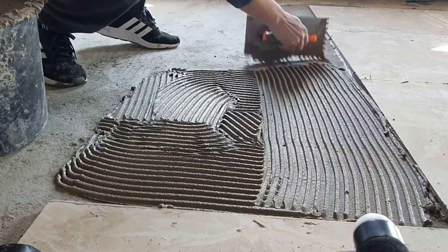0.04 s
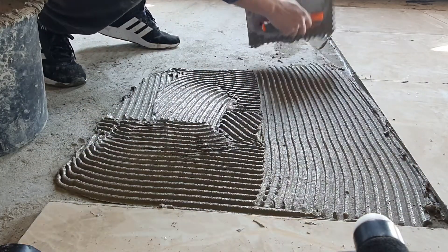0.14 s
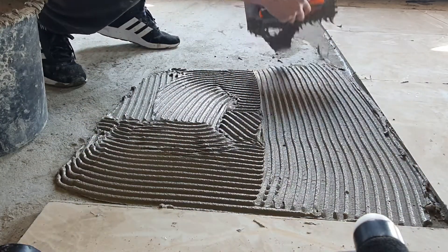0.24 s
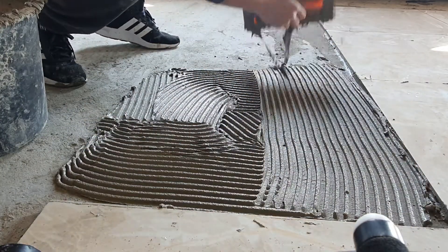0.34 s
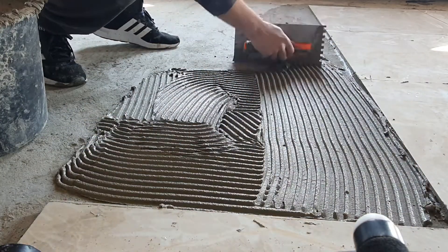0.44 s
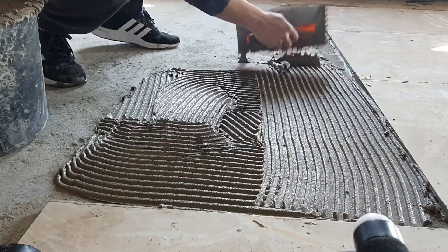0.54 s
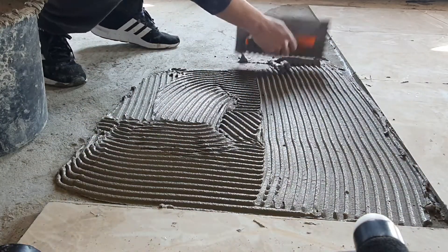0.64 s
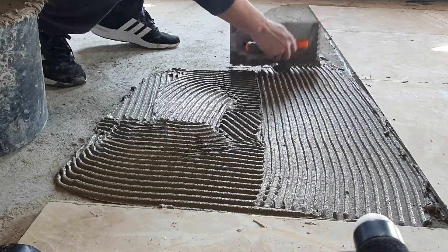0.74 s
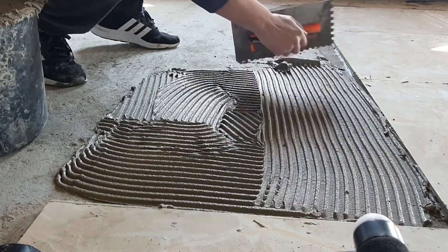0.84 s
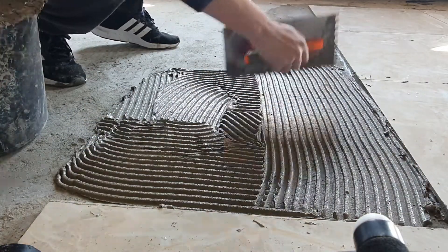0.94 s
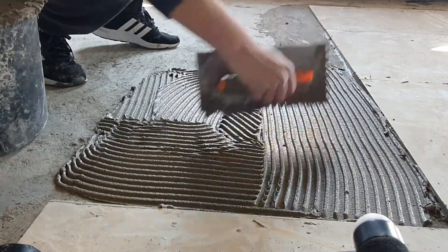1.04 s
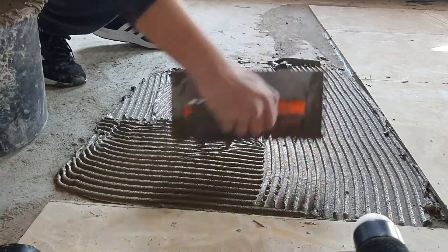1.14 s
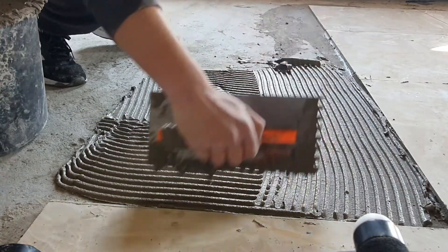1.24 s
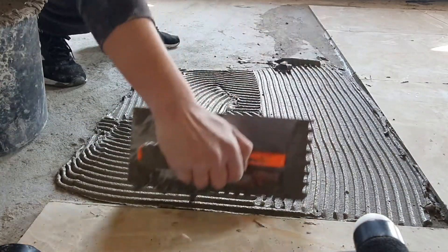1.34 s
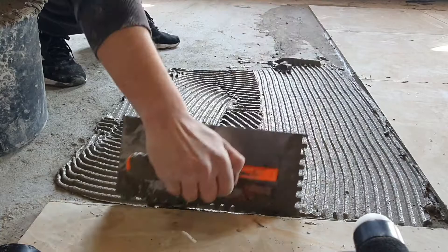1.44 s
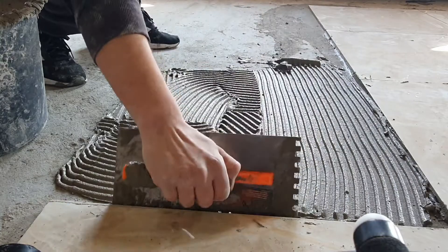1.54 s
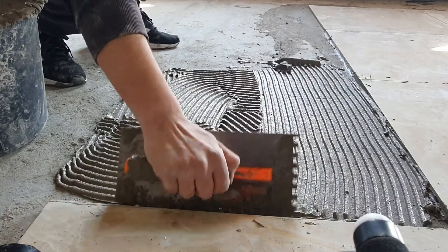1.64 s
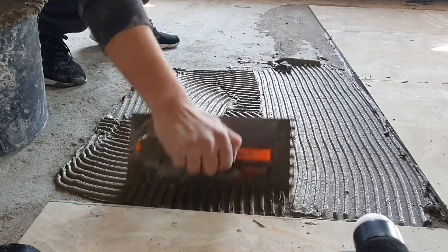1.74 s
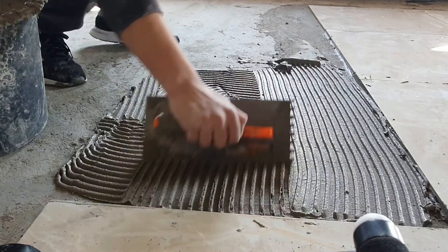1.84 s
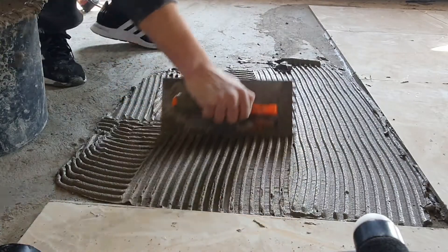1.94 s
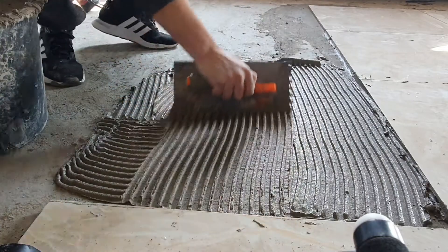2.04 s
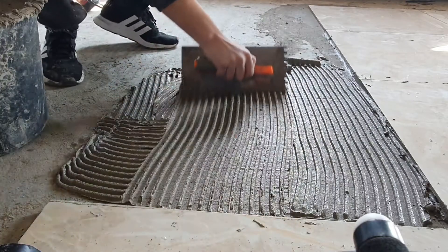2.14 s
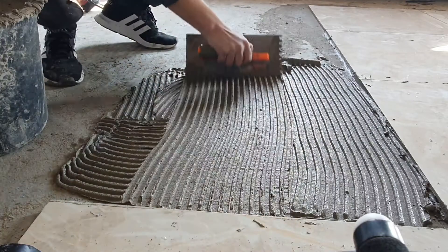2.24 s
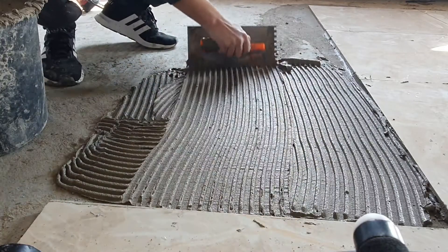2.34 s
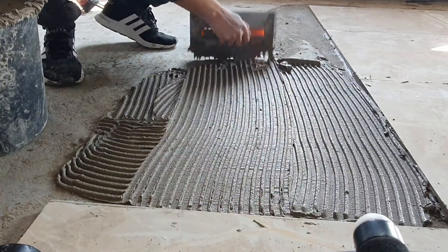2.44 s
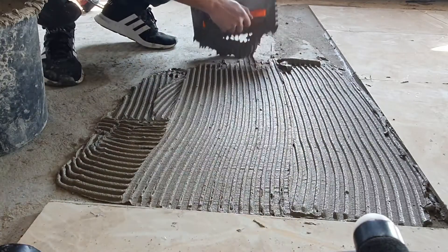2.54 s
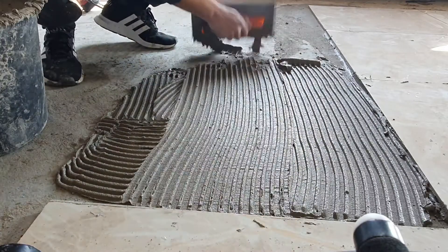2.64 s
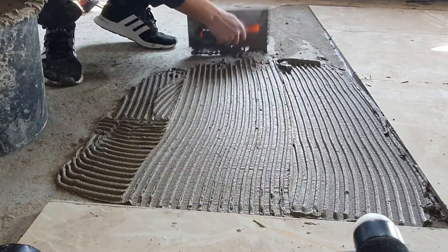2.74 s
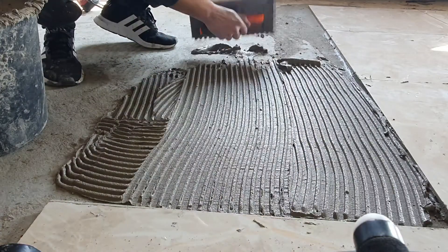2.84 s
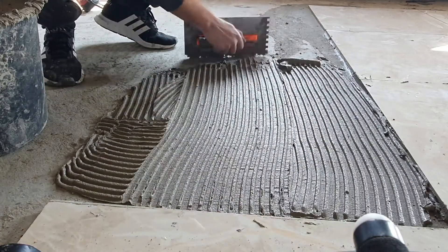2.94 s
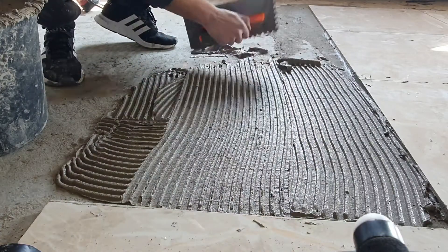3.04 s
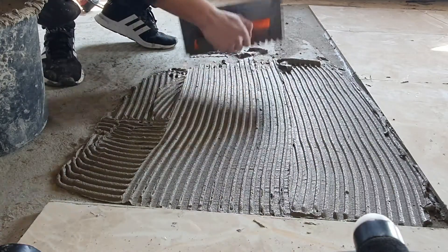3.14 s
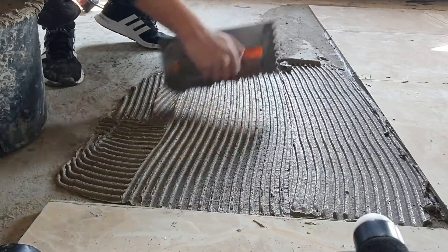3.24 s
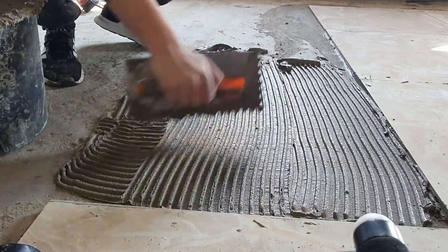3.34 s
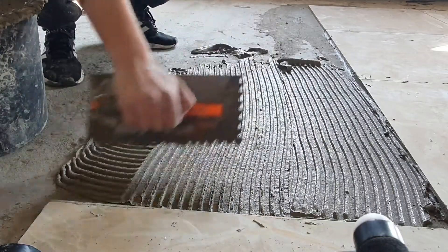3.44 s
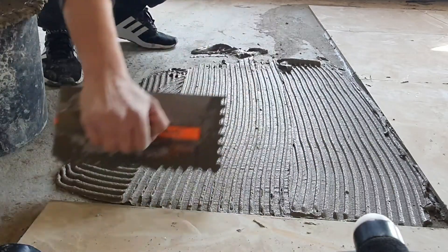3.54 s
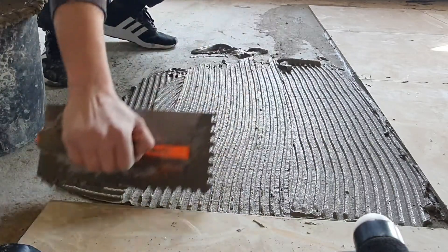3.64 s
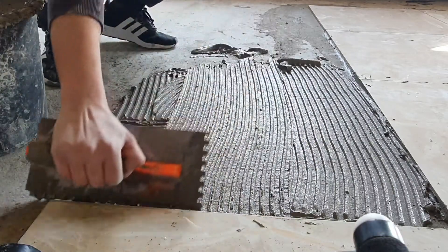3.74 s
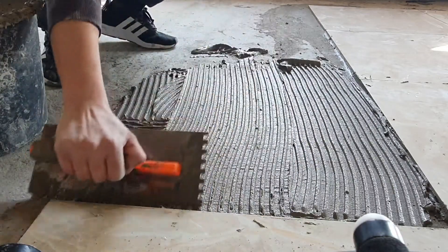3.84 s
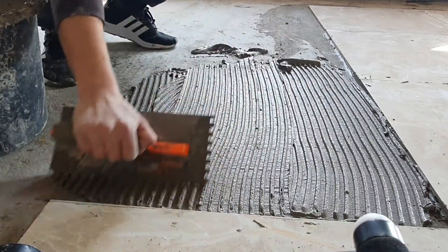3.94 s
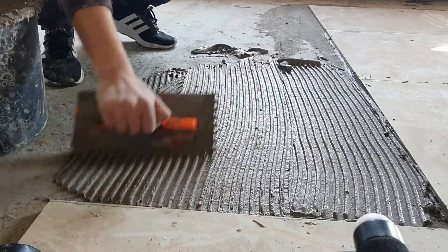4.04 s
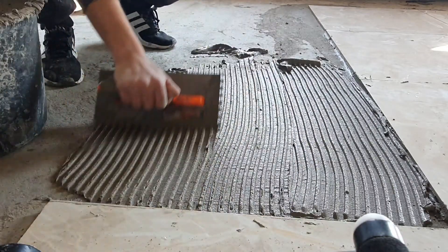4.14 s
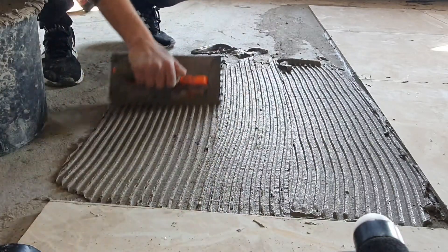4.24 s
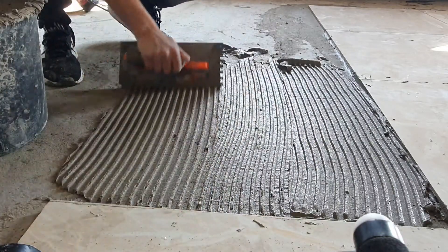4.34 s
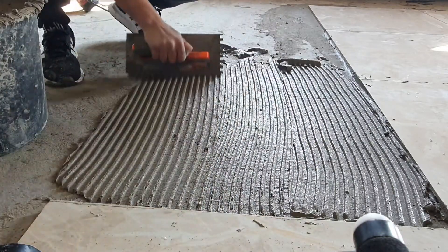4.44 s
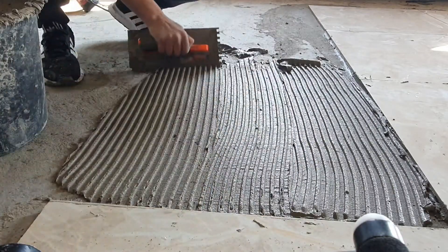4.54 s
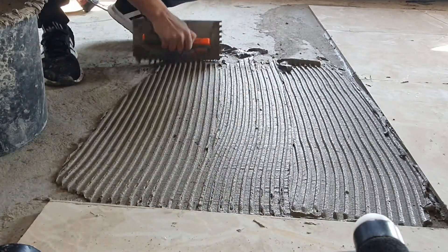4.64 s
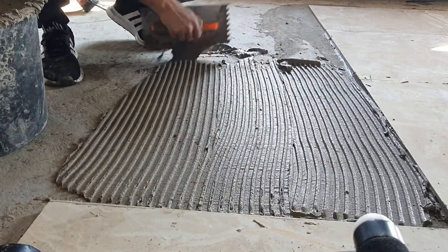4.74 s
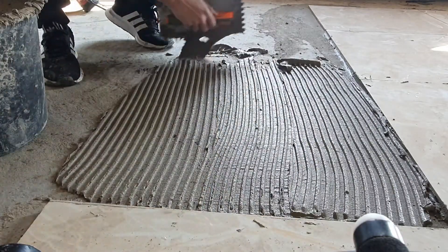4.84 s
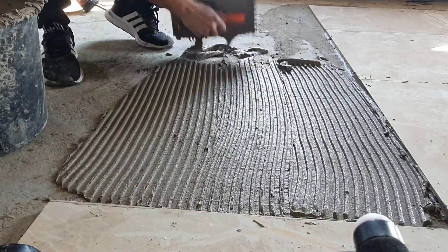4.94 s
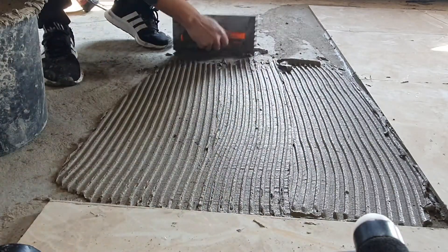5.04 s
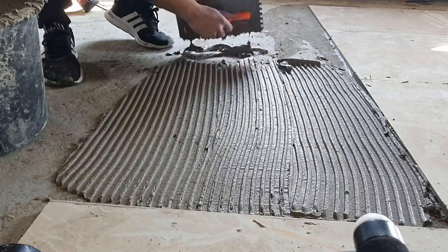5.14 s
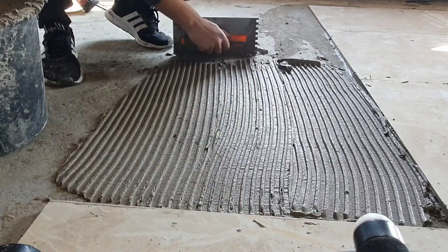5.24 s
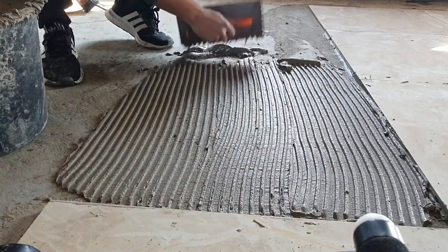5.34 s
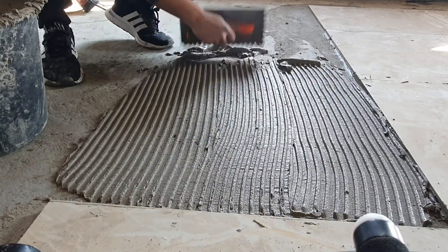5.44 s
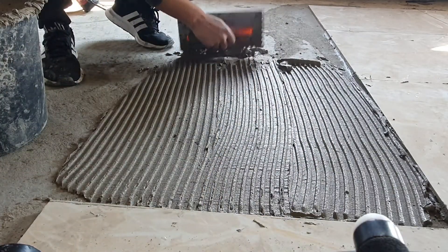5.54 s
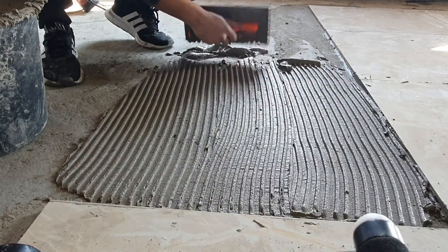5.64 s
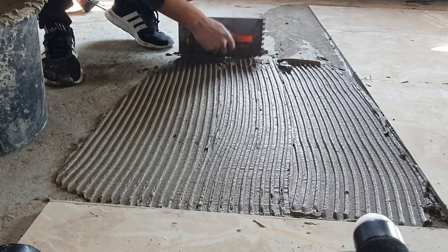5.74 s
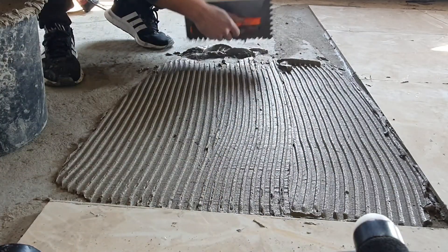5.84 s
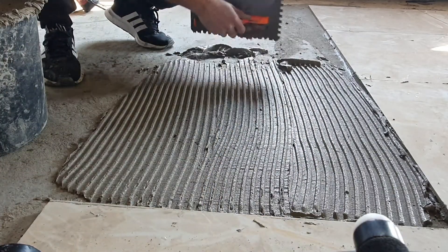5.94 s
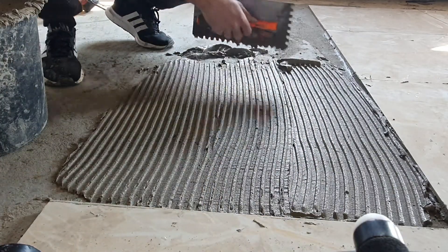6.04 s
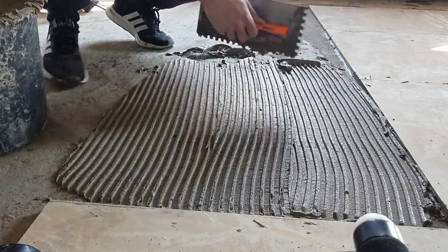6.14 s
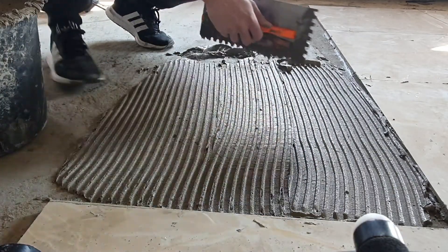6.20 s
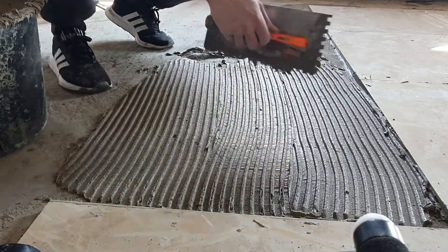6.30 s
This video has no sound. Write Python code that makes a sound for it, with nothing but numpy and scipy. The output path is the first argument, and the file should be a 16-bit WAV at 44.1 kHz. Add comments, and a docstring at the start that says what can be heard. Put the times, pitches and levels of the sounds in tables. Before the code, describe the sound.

In a bare, echoing garage, the tail of a trowel stroke is followed by two sharp knocks of steel on concrete. A long gritty scrape follows, juddering and fading as it moves away, then two more knocks, a second long scrape and four spaced clacks. Fine sand hisses under the teeth. Finally a soft shoe shifts on the floor. Close stereo pickup with lively room reflections.

```python
"""In a bare, echoing garage a notched steel trowel combs wet tile adhesive over a concrete floor.
One stroke is just ending, two full ones follow: stick-slip judders the teeth, the blade rings, sand hisses.
Each stroke fades as it is drawn away; where the hand bears down it swells, brightens and judders lower.
After each stroke the trowel is knocked on the floor to shed adhesive: a clack, a boom and a brief free ring.
Single teeth tick now and then; at the end a soft shoe is set down."""
import sys
import numpy as np
from scipy import signal
from scipy.fft import rfft, irfft
from scipy.io import wavfile
from scipy.ndimage import uniform_filter1d

SR = 44100
rng = np.random.default_rng(int(sys.argv[2]) if len(sys.argv) > 2 else 0)


def inscribe(sig):
    """Save sig as 16-bit PCM at rate SR to the path in sys.argv[1].

    A 1-D sig is mono; a 2-D sig holds one channel per row.
    Samples are clipped to [-1, 1] before scaling.
    """
    pcm = np.round(np.clip(np.atleast_2d(sig).T, -1, 1) * 32767)
    wavfile.write(sys.argv[1], SR, pcm.astype(np.int16))


N = 280917

LEAD = SR // 2   # samples: the work is under way half a second early, so the room already rings
TIME = np.arange(-LEAD, N) / SR
M = len(TIME)

# Strokes drawn away from the microphones. Each row: start in seconds, end in seconds, relative level in dB,
# fade in dB per second, stickiness of the paste in dB, which lifts judder and drag.
STROKES = [(-0.2, -0.01, 0.31, 4.8, -0.5), (1.637, 2.358, -0.47, 6.3, 1.5), (3.838, 4.602, -0.8, 16.2, 0)]
# The hand bears down and the teeth bite through to the concrete. Each row: start in seconds,
# length in seconds, extra pressure in dB, extra rasp in dB.
BITES = [(-0.04, 0.061, 8.5, -11.5), (1.643, 0.092, 1.5, 2.5), (1.745, 0.067, 5.5, 2), (1.94, 0.085, 6, -2),
         (2.264, 0.108, 9.5, 0), (2.322, 0.037, 1, 5), (3.868, 0.19, 6, 2), (4.322, 0.038, 11, -4.5),
         (4.478, 0.14, 12, 0)]
# The teeth catch and the blade shudders for a moment. Each row: time in seconds, relative judder level in dB.
SHUDDERS = [(0.041, -23.5), (1.855, -26.5), (1.955, -22), (2.11, -26), (2.161, -23.5), (2.205, -21.5),
            (2.41, -21.5), (2.565, -33.5), (3.901, -17.5), (4.211, -32), (4.366, -27)]
# The edge brushes the floor as it is set down. Each row: time in seconds, level in dB against a full stroke.
GRAZES = [(1.502, -34), (1.548, -26), (1.573, -30), (3.775, -17.5), (3.795, -10.5), (3.811, -11.5),
          (3.839, -18), (5.012, -10), (5.245, -9.5)]
# Friction laws of the layers. Columns: relative level at the start of a stroke in dB,
# extra fade in dB per second, share of a bite's dB, release in dB per second.
JUDDER_LAW = (-28, -2, 0.67, 68.5)
DRAG_LAW = (-28.5, -1, 0.7, 99)
RASP_LAW = (-23, 10, 1, 117)
SAND_LAW = (-34.5, 1.5, 1.0326, 381.5)
# Spectral shapes of the four layers. Each row: frequency in Hz, relative level in dB.
JUDDER_SPECTRUM = [(40, -21), (100, -4), (300, -4.5), (650, 10.0), (1300, -14.5), (5000, -21.5)]
DRAG_SPECTRUM = [(30, -43), (60, -30.5), (90, -17), (130, -1.5), (170, -3.5), (240, -0.5), (370, 6.5),
                 (600, -6), (1000, -1), (3000, -32.5)]
RASP_SPECTRUM = [(30, -38), (80, -28), (300, -14.5), (500, -7), (690, 0), (880, 8), (1050, 1), (1400, -8),
                 (2200, -11), (3200, -19.5), (4500, -30), (8000, -50.5), (16000, -49)]
SAND_SPECTRUM = [(800, -9.5), (2500, 11), (4500, 4), (6500, 2.5), (7600, -4.5), (10000, -1.5),
                 (11800, -4.5), (13500, -4), (16000, -10.5)]
# The blade's modes. Each row: frequency in Hz, width in Hz, level in dB against the driving force.
BLADE_MODES = [(743, 180, -2.5), (978.4, 12, -1), (1924, 130, -9.5), (2420, 49, -7.5), (3250, 140, -4),
               (5420, 80, 2), (5960, 920, -14)]
# Knocks of the blade, one corner a little before or after the other. Each row: time in seconds,
# relative level in dB, extra treble in dB, extra bass in dB, relative boom in dB, ring in dB against the
# blow, at either corner, ring frequency in Hz, seconds until the adhesive stops the ring,
# the other corner's delay in seconds, the other corner's relative level in dB.
KNOCKS = [(0.4577, -6.5, 3, 1, -9, -15, 964, 0.018, -0.006, -13),
          (0.7079, -6.5, 4.5, -3, 0.5, -7, 862, 0.013, -0.016, -10.5),
          (2.7038, -12, 6.5, -3.5, 12.5, -8, 870, 0.011, 0.014, 0.5),
          (2.9326, -7.5, 2, 4.5, 6.5, -8, 824, 0.015, 0.0056, -13),
          (5.0245, -6.5, 3.5, -5, 8.5, -10.5, 1115, 0.0061, -0.0073, -13),
          (5.255, -14.5, 8, 8, -16, -6, 720, 0.0065, 0.005, -7),
          (5.5003, -13, 9, 7, -5, -2.5, 823, 0.014, 0.002, -13.5),
          (5.714, -9.5, 7.5, 1.5, -2, -7.5, 823, 0.0102, 0.0105, -8)]
# A single tooth ticks on the floor or on a coarse grain. Each row: time in seconds, relative level in dB,
# extra treble in dB.
TICKS = [(1.51, -45, 5.5), (1.585, -40.5, 10), (1.808, -16, 1), (2.194, -19.5, -2), (3.781, -44.5, 7),
         (4.142, -18.5, -8), (4.251, -23.5, -6), (4.329, -22, 6), (5.034, -19, 0), (5.2755, -24.5, 13.5)]
# Dispersion: where the blade delays the blow. Each row: frequency in Hz, width in Hz.
DISPERSION = [(1300, 240), (2000, 120), (2900, 470), (4000, 930), (5200, 490), (6800, 730), (10000, 1300)]
# Spectral shapes of the blow and the crushed grit. Each row: frequency in Hz, relative level in dB.
CLACK_SPECTRUM = [(30, -42.5), (70, -3.5), (110, -6.5), (250, -1.5), (420, 2.5), (700, 5.5), (1200, 3.5),
                  (1600, -1.5), (2500, -8), (4000, -21), (6500, -30), (7800, -41.5), (12000, -42),
                  (16000, -66)]
CRUNCH_SPECTRUM = [(1500, -18), (5000, 5.0), (7500, -5.5), (15000, -8.0)]
# Small sounds of shifting the feet. Each row: time in seconds, relative level in dB,
# decay time in seconds, extra treble in dB.
SHUFFLES = [(6.132, -57, 0.031, 29), (6.267, -41.5, 0.073, -2), (6.302, -50, .03, 11)]
# Spectral shape of the sole. Each row: frequency in Hz, relative level in dB.
SOLE_SPECTRUM = [(30, -15), (80, 1), (160, 0), (400, -1), (650, 2), (1200, -17.5), (3000, -21.5),
                 (7000, -39), (16000, -54)]
# How strongly clacks feed the room. Each row: frequency in Hz, gain in dB.
RADIATION = [(120, 5.5), (400, 3.5), (900, 5.5), (1400, 3.0), (2600, 2.5), (3300, 0.0), (9000, 7.0)]
# Reverberation of the garage. Each row: frequency in Hz, time to decay by 60 dB in seconds.
GARAGE_T60 = [(70, 1), (160, 0.96), (280, 0.57), (500, 0.86), (900, 0.9), (2400, 0.926), (3200, 0.76),
              (5500, 0.64), (8000, 0.48), (15000, 0.22)]
# Strength of the echo. Each row: frequency in Hz, relative level in dB.
GARAGE_WET = [(80, -1.5), (300, -2), (850, -5.5), (1600, 2.5), (5000, 2), (15000, -2.5)]
# Correlation of left and right in diffuse sound. Each row: frequency in Hz, likeness from -1 to 1.
LIKENESS = [(60, 1), (150, 0.93), (300, 0.89), (640, 0.55), (1400, -0.18), (3000, 0.024), (15000, -0.64)]
# Balance of the sides. Each row: frequency in Hz, left minus right in dB.
BALANCE = [(100, -0.9), (400, -0.6), (1300, 3), (2500, 3.5), (7000, 3), (15000, 8)]
# Spectral shape of the quiet garage air. Each row: frequency in Hz, relative level in dB.
QUIET_SPECTRUM = [(25, -5), (50, 1), (75, 13.5), (110, -11.5), (250, -6), (500, -24), (850, -8.5),
                  (1500, -17), (3000, -29), (7000, -32), (12000, -27.5), (16000, -35)]

ATTACK_S, BITE_EDGE_S, SHUDDER_S = 0.039, 0.015, 0.013
GRAZE_RISE_S, GRAZE_DECAY_S = 0.0064, 0.016
JUDDER_HZ, SAG_OCTAVES_PER_DB = 545, 0.1   # the harder the blade is pressed, the lower it judders
BOOM_HZ, BOOM_WIDTH_HZ = 160, 9
UPPER_MODE_RATIO, UPPER_MODE_DB = 1.16, -10.5   # second bending mode, a little above the first
TICK_BASS_DB, TICK_RING_DB, TICK_RING_HZ, TICK_FREE_S = 3, -2.5, 932, 0.011
CUSHION_DB = -18   # treble of the other corner when it lands second, into the adhesive
CUTOFF_HZ = 15950


def combing():
    """Friction over grit: random catches drive judder, a low drag through the paste, blade rasp and sand hiss."""
    press_db, rasp_db = bites()
    shudders = sum(from_db(db) * np.exp(-((TIME - s) / SHUDDER_S) ** 2) for s, db in SHUDDERS)
    catch = from_db(2.7 * drift(60))   # all teeth catch and let go together
    clumps = from_db(2.37 * drift(25))   # the sand lies unevenly in the paste
    teeth = from_db(-0.9) * judder(grains(700, 2.7) * catch, press_db, width_hz=94)
    drag = from_db(-5.0) * steady(colour(grains(900, 0.83) * catch, DRAG_SPECTRUM))
    rasp = from_db(1.5) * steady(colour(blade(grains(1800, 3.36) * catch), RASP_SPECTRUM))
    sand = from_db(1.5) * steady(colour(grains(3500, 3.6) * catch * clumps, SAND_SPECTRUM))
    return ((friction(JUDDER_LAW, press_db, sticky=True) + shudders) * teeth
            + friction(DRAG_LAW, press_db, sticky=True) * drag
            + friction(RASP_LAW, press_db, sticky=False) * from_db(rasp_db) * rasp
            + friction(SAND_LAW, press_db, sticky=False) * sand)


def judder(slips, press_db, width_hz):
    """Stick-slip excitation: the flexing blade answers each slip at a resonance that pressure lowers."""
    pitch = JUDDER_HZ * 2 ** (-SAG_OCTAVES_PER_DB * press_db) * (1 + 0.07 * drift(15))
    out, state, block = np.zeros(M), np.zeros(2), 128
    for i in range(0, M, block):
        # carrying the filter state keeps the ringing unbroken as the pitch moves
        coefficients = resonance(pitch[i], width_hz)
        out[i:i + block], state = signal.lfilter(*coefficients, slips[i:i + block], zi=state)
    return steady(colour(out, JUDDER_SPECTRUM))


def friction(law, press_db, sticky):
    """Friction envelope: a layer sets in, fades with distance, swells under pressure and is released."""
    start_db, extra_fade, bite_share, release = law
    level = np.zeros(M)
    for start, end, db, fade, sticky_db in STROKES:
        attack = np.clip((TIME - start) / ATTACK_S, 0, 1)
        drawn_s = np.clip(TIME - start, 0, end - start)
        loss_db = (fade + extra_fade) * drawn_s + release * np.maximum(TIME - end, 0)
        level += attack * from_db(db - loss_db + bite_share * press_db + sticky * sticky_db)
    for s, db in GRAZES:
        age = np.maximum(TIME - s, 0)
        rise = np.minimum(age / GRAZE_RISE_S, 1)
        decay = np.exp(-np.maximum(age - GRAZE_RISE_S, 0) / GRAZE_DECAY_S)
        level += from_db(db) * rise * decay
    return from_db(start_db) * level


def bites():
    """Normal force: the hand's extra pressure and the bared concrete's extra rasp, in dB, swell and ease."""
    s, length_s, db, rasp_db = np.transpose(BITES)[:, :, None]
    rise_and_fall_s = np.minimum(TIME - s, s + length_s + BITE_EDGE_S - TIME)
    depth = np.clip(rise_and_fall_s / BITE_EDGE_S, 0, 1)
    return (db * depth).sum(axis=0), (rasp_db * depth).sum(axis=0)


def steady(x):
    """Level regulation: the hand keeps the friction even, at rms 1 over about 30 ms."""
    return x / np.sqrt(np.abs(uniform_filter1d(x * x, size=1300)) + 1e-12)


def blade(force):
    """Modal superposition: the steel's resonances ring on top of the force that drives them."""
    return force + sum(from_db(db) * signal.lfilter(*resonance(hz, width_hz), force)
                       for hz, width_hz, db in BLADE_MODES)


def knocks():
    """Impact: contacts clack and crush grit; the bent blade swings freely until it seats in the adhesive."""
    clacks, rings, t = np.zeros(M), np.zeros(M), np.arange(SR // 4) / SR
    clack = colour(1.0 * (t == 0), CLACK_SPECTRUM)
    clack /= np.abs(clack).max()
    for hz, width_hz in DISPERSION:   # all-passes: bending waves travel at unequal speeds, thickening the blow
        clack = clack - 2 * signal.lfilter(*resonance(hz, width_hz), clack)
    boom = signal.lfilter(*resonance(BOOM_HZ, BOOM_WIDTH_HZ), clack)
    clack = blade(clack)
    for s, db, treble_db, bass_db, boom_db, ring_db, ring_hz, free_s in contacts():
        grit = rng.standard_normal(len(t)) * np.exp(-t / 0.0067)
        crunch = colour(grit, CRUNCH_SPECTRUM)
        tone = [(250, bass_db), (850, 0.015), (2400, 0.02), (3400, treble_db), (9000, treble_db / 2)]
        blow = clack + from_db(boom_db) * boom + from_db(-36.0) * crunch
        add(clacks, s, from_db(db + 1.5) * colour(blow, tone))
        free = np.clip((free_s - t) / 0.0016 + .5, 0, 1) * np.minimum(t / 0.0016, 1)
        phase = 2 * np.pi * ring_hz * t
        bending = np.sin(phase) + from_db(UPPER_MODE_DB) * np.sin(UPPER_MODE_RATIO * phase)
        swing = free * np.exp(-t / .035) * bending
        add(rings, s, from_db(db + ring_db) * swing)
    return clacks, rings


def contacts():
    """Successive impacts: both corners of every knock, then each tick, as rows of a knock's first eight columns."""
    for s, db, treble_db, *body, other_s, other_db in KNOCKS:
        yield s, db, treble_db, *body
        yield s + other_s, db + other_db, treble_db + CUSHION_DB * (other_s > 0), *body
    for s, db, treble_db in TICKS:
        yield s, db, treble_db, TICK_BASS_DB, 0, TICK_RING_DB, TICK_RING_HZ, TICK_FREE_S


def footstep():
    """Impact with friction: a soft sole lands as an impulse and scuffs the gritty floor as decaying noise."""
    out, t = np.zeros(M), np.arange(SR // 4) / SR
    for s, db, length_s, treble_db in SHUFFLES:
        grit = 0.067 * rng.standard_normal(len(t)) * np.exp(-t / length_s)
        scuff = colour((t == 0) + grit, SOLE_SPECTRUM)
        scuff /= np.abs(scuff).max()
        add(out, s, from_db(db) * colour(scuff, [(1000, 0.003), (10000, treble_db)]))
    return out


def garage(x, places_per_s, count):
    """Position-dependent reverberation: as the trowel moves, the sound crossfades between echo patterns."""
    wet = 0
    for k in range(count):
        away = (TIME * places_per_s - k + 1) % count - 1   # distance from place k, in places
        share = np.cos(np.pi / 2 * np.minimum(np.abs(away), 1))
        echo = garage_echo(first_s=0.00059, build_s=0.0057)
        wet = wet + signal.fftconvolve((share * x)[None], echo, axes=1)[:, :M]
    return wet


def garage_echo(first_s, build_s):
    """Diffuse decay: dense echoes off bare walls build up quickly and die away band by band."""
    t, hz = np.arange(SR) / SR, np.fft.rfftfreq(SR, 1 / SR)
    noise, out = two_ports(hz, size=SR), 0
    centres = np.geomspace(50, 16000, 18)
    onset = np.clip((t - first_s) / build_s, 0, 1)
    for centre, share in zip(centres, np.eye(len(centres))):
        fade = onset * from_db(-60 * t / at_hz(GARAGE_T60, centre))
        band = irfft(noise * at_hz(np.column_stack([centres, share]), hz), SR)
        unit_fade = fade / np.sqrt(np.sum(fade ** 2))
        out = out + band * unit_fade * from_db(at_hz(GARAGE_WET, centre))
    return out


def two_ports(hz, size):
    """Spatial coherence: noise spectra alike in the bass, partly opposed in the top treble."""
    mid, side = rfft(rng.standard_normal((2, size)))
    alike = np.clip(at_hz(LIKENESS, hz), -1, 1)
    return np.sqrt((1 + alike) / 2) * mid + np.sqrt((1 - alike) / 2) * side * [[1], [-1]]


def background():
    """Stationary diffuse noise: the faint steady air of the garage."""
    hz = np.fft.rfftfreq(M, 1 / SR)
    air = irfft(two_ports(hz, size=M) * from_db(at_hz(QUIET_SPECTRUM, hz)), M)
    return from_db(-73.5) * rms_one(air)


def from_db(db):
    """Logarithmic level: decibels to amplitude gain."""
    return 10 ** (np.asarray(db) / 20)


def rms_one(x):
    """Mean power: scale to rms 1."""
    return x / np.sqrt(np.mean(x ** 2) + 1e-20)


def at_hz(points, hz):
    """Logarithmic pitch scale: interpolate a table over log frequency."""
    f, value = np.transpose(points)
    return np.interp(np.log(np.maximum(hz, 1)), np.log(f), value)


def colour(x, spectrum):
    """Minimum phase: a causal filter with the given spectrum, found by folding the cepstrum."""
    size = 8192
    cepstrum = irfft(np.log(from_db(at_hz(spectrum, np.fft.rfftfreq(size, 1 / SR)))))
    cepstrum[1:size // 2] *= 2
    cepstrum[size // 2 + 1:] = 0
    response = irfft(np.exp(rfft(cepstrum)))[:size // 2]
    return signal.fftconvolve(x, response)[:len(x)]


def resonance(hz, width_hz):
    """Damped oscillator: filter coefficients of a resonance with gain 1 on top."""
    r = np.exp(-np.pi * width_hz / SR)
    return (1 - r * r) / 2 * np.array([1, 0, -1]), [1, -2 * r * np.cos(2 * np.pi * hz / SR), r * r]


def drift(rate):
    """Low-passed noise: smooth chance with spread 1, computed at every 40th sample."""
    r = np.exp(-80 * np.pi * rate / SR)
    chance = rng.standard_normal(M // 40 + 2002)
    slow = signal.lfilter([1], [1, -2 * r, r * r], chance)[2000:]   # the filter's start is dropped
    return np.interp(np.arange(M) / 40, np.arange(len(slow)), rms_one(slow))


def grains(per_s, spread_db):
    """Shot noise: random clicks of uneven size and either sign."""
    sizes = from_db(spread_db * np.minimum(rng.exponential(1, M), 4)) * rng.choice([-1, 1], M)
    return sizes * (rng.random(M) < per_s / SR) + 1e-18


def add(track, s, sound):
    """Superposition: mix a sound in at time s."""
    i = LEAD + round(s * SR)
    track[i:i + len(sound)] += sound[:M - i]


def scene():
    """Direct plus reverberant field: the free ring feeds the room less; the left side has more treble."""
    strokes, steps = from_db(-4.0) * combing(), footstep()
    clacks, rings = knocks()
    radiated = colour(clacks, RADIATION)
    into_room = from_db(1.48) * strokes + radiated + from_db(-2.5) * rings + steps
    wet = garage(into_room, places_per_s=14, count=4)
    both = strokes + clacks + rings + steps + wet
    sides = [colour(x, [(hz, sign * db / 2) for hz, db in BALANCE]) for x, sign in zip(both, (1, -1))]
    return (np.array(sides) + background())[:, LEAD:]


def record(dry):
    """Band limiting: an elliptic low-pass cuts the top steeply."""
    return signal.sosfilt(signal.ellip(10, .2, 80, CUTOFF_HZ, fs=SR, output="sos"), dry)


dry = scene()
out = record(dry)
inscribe(out)
```